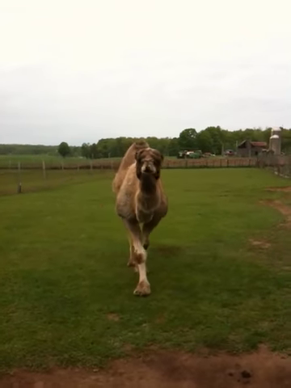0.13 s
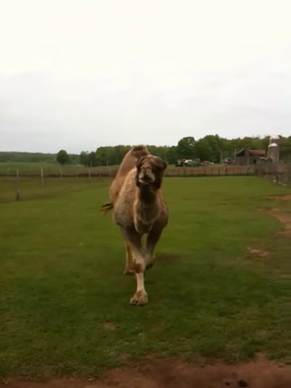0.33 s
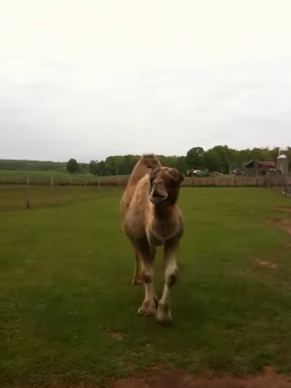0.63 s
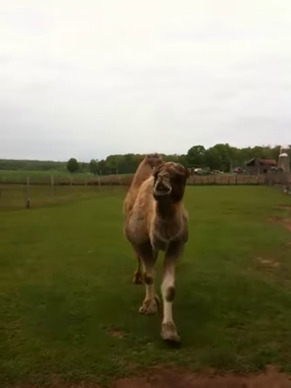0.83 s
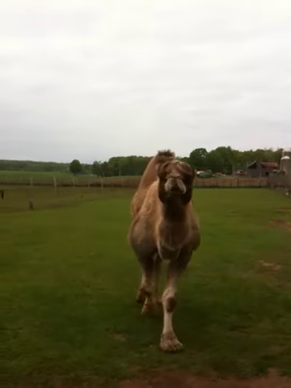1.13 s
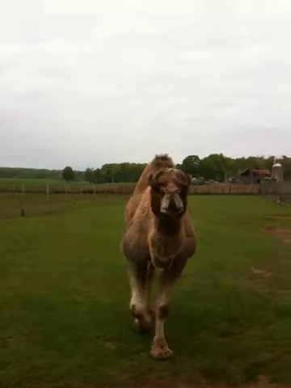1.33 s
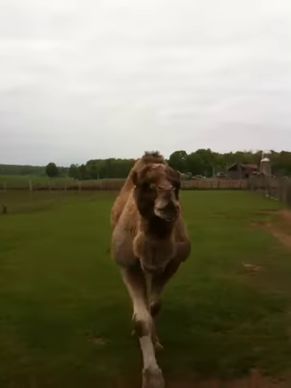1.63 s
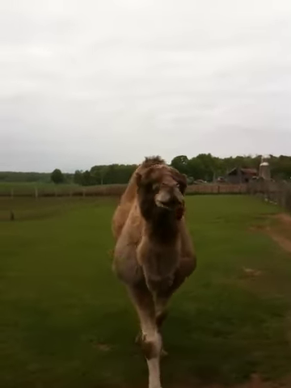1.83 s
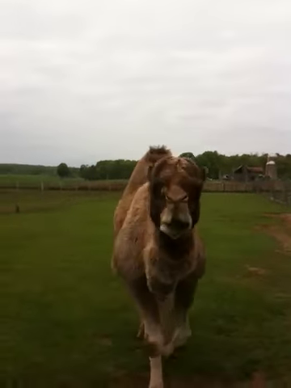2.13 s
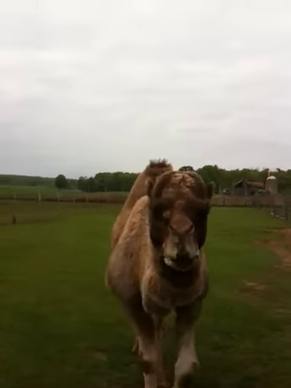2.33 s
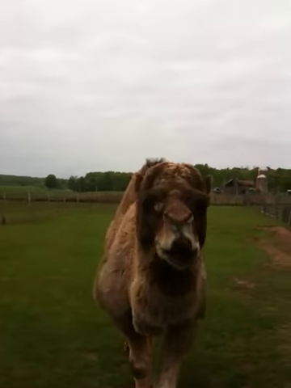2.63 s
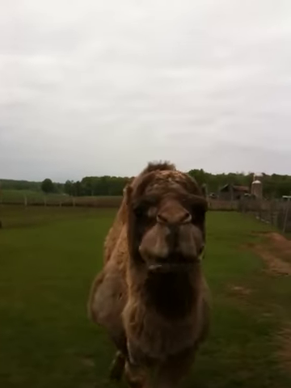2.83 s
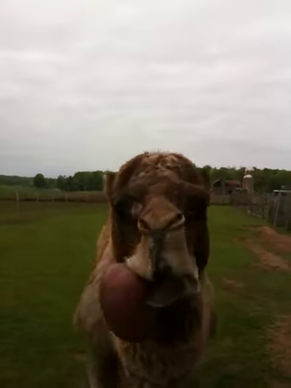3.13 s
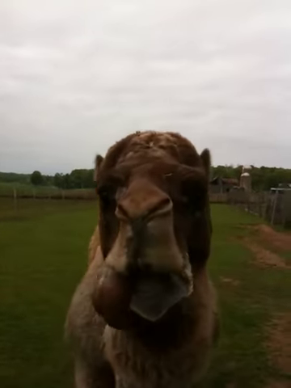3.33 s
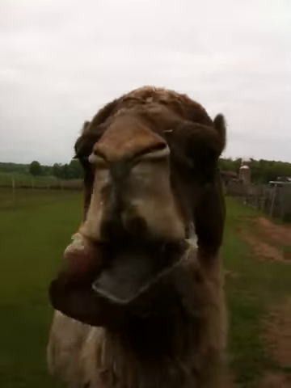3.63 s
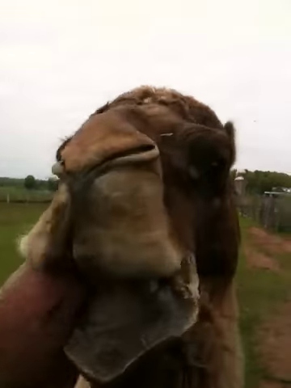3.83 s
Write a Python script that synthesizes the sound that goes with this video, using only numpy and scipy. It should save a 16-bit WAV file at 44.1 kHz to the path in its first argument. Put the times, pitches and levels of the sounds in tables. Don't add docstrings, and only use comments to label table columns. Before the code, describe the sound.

Camel gurgling very close to a handheld microphone outdoors: near silence with faint wind first, a few dull steps, a slow rattling throat growl, then loud deep bubbling, flapping and spitty air bursts.

```python
import sys
import numpy as np
from scipy import signal
from scipy.fft import rfft, irfft, next_fast_len
from scipy.io import wavfile
from scipy.ndimage import uniform_filter1d, map_coordinates

SR = 44100
rng = np.random.default_rng(int(sys.argv[2]) if len(sys.argv) > 2 else 0)


def natural_amplitude(level_db):
    exponent = np.asarray(level_db, float) / 20
    return 10 ** exponent


def wav_out(sig):
    wavfile.write(sys.argv[1], SR, np.round(np.clip(np.atleast_2d(sig).T, -1, 1) * 32767).astype(np.int16))


N = 176400


def unit(x):
    return x / np.sqrt(np.mean(x ** 2) + 1e-20)


def curves(rows):
    s, *columns = np.transpose(rows)
    return [np.interp(np.arange(N) / SR, s, column) for column in columns]


def wobble(rate):
    knots = rng.standard_normal(int(N * rate / SR) + 4)
    return map_coordinates(knots, [np.arange(N) * rate / SR])


def filtered(x, response):
    m = next_fast_len(N + SR // 2)
    return irfft(rfft(x, m) * response(np.fft.rfftfreq(m, 1 / SR)), m)[:N]


def noise(points, tilt_db=0):
    f, db = np.transpose(points)

    def colour(hz):
        level_db = np.interp(np.log(hz + 1), np.log(f + 1), db, -120, -120)
        return natural_amplitude(level_db + tilt_db * np.log2(hz / 3000 + 0.091))

    return unit(filtered(rng.standard_normal(N), colour))


def patchy(x, depth_db):
    z = signal.stft(x, nperseg=512)[2]
    field = uniform_filter1d(rng.standard_normal(z.shape), size=3, axis=0)
    field = uniform_filter1d(field, size=4, axis=1)
    return unit(signal.istft(z * natural_amplitude(depth_db * unit(field)), nperseg=512)[1][:N])


def resonate(x, peaks):
    def response(f):
        total = 0
        for k, (centre, width, db) in enumerate(peaks):
            peak = 1j * f * width / (centre ** 2 - f ** 2 + 1j * f * width)
            total = total + (-1) ** k * natural_amplitude(db / 2) * peak
        return total ** 2

    return unit(filtered(x, response))


def bubbles(rows, cycles, soft, rise, gain_db):
    out = np.zeros(N + SR)
    for (s, db, hz), start in zip(rows, rng.random(len(rows))):
        u = np.arange(int(8 * cycles * SR / hz)) * hz / SR / cycles
        shape = (1 - np.exp(-u / soft)) * np.exp(-u)
        tone = np.sin(2 * np.pi * (cycles * (u + rise * u * u / 2) + start))
        out[round(s * SR):][:len(u)] += natural_amplitude(db + gain_db) * shape / shape.max() * tone
    return out[:N]


def gulps(rows, rise):
    out, shake = np.zeros(N + SR), wobble(60)
    for (s, length, db, hz), start in zip(rows, rng.random(len(rows))):
        u = np.linspace(-1, 1, int(1.15 * length * SR))
        at = int((s - .575 * length) * SR)
        near = np.minimum(at + np.arange(len(u)), N - 1)
        pitch_hz = hz * (1 + rise * u / 2 + 0.043 * shake[near])
        phase = 2 * np.pi * (start + np.cumsum(pitch_hz) / SR)
        out[at:][:len(u)] += np.sqrt(2) * natural_amplitude(db) * np.cos(np.pi * u / 2) ** 1.23 * np.sin(phase)
    return out[:N]


# pitch_hz, level_db (per Hz)
HISS_COLOUR = [(530, -33.5), (1000, -3.5), (5000, -6), (15700, -9)]


def hiss():
    return natural_amplitude(-76.5) * noise(HISS_COLOUR)


# pitch_hz, level_db (per Hz)
WIND_COLOUR = [(25, -26), (140, 0), (310, -7.5), (430, -14.5), (1000, -22.5), (2000, -39)]
# middle_s, length_s, level_db, pitch_hz
BUFFETS = [
    (2.35, .5, -78, 45.4),
    (3.645, .05, -65, 34.5),
]


def wind():
    rumble = natural_amplitude(-71 + 1.5 * wobble(1.75) + 3.2 * wobble(20)) * noise(WIND_COLOUR)
    return rumble + natural_amplitude(4.5 * wobble(25)) * gulps(BUFFETS, rise=0.064)


# start_s, peak_db, pitch_hz
STEPS = [
    (.696, -50, 140),
    (1.091, -54, 310),
    (1.423, -43, 177),
    (2.074, -35.5, 190),
    (2.872, -41, 213),
]


def feet():
    scuffs = [(s - .003, db - 12, 2.7 * hz) for s, db, hz in STEPS[:3]]
    thuds = bubbles(STEPS, cycles=0.73, soft=0.54, rise=-0.1, gain_db=0.5)
    return thuds + bubbles(scuffs, cycles=1.0, soft=0.45, rise=0.01, gain_db=-4.0)


# time_s, level_db, mouth_open_db
GROWL = [(0, -101, -26), (.58, -91, -26), (.7, -66.5, -38), (.9, -78.5, -23), (1.06, -63.5, -20.5),
         (1.3, -82, -11), (1.5, -66.5, -25), (1.64, -57, -18), (1.8, -58.5, -27), (1.91, -48, -27.5),
         (2.0, -55.5, -26.5), (2.13, -52, -11), (2.3, -51, -13), (2.42, -47, -9.5), (2.56, -52, -17.5),
         (2.64, -52, -13.5), (2.78, -51.5, -27.5), (2.87, -47.5, -25.5), (3.05, -55, -16.5)]
# time_s, roughness (0-1)
ROUGHNESS = [
    (1.4, .5),
    (1.6, .12),
    (1.82, .15),
    (1.9, .35),
    (2.1, .12),
    (2.76, .08),
    (2.86, .5),
]
# time_s, pulses
BEATS = [(0, 0), (1.552, 44), (1.662, 47), (1.722, 49), (1.83, 52), (1.905, 55), (2.041, 61), (2.116, 65),
         (2.191, 69), (2.328, 76), (2.391, 79), (2.493, 84), (2.607, 89), (2.712, 94), (2.872, 101),
         (3.1, 112)]
# pitch_hz, width_hz, level_db
THROAT = [(125, 65.5, -14.5), (186.5, 31, 0.5), (250.7, 54, -15.5), (401.6, 90, -23.5)]
# pitch_hz, width_hz, level_db
MOUTH = [(514, 210, -6), (664.6, 80, 3.5), (776, 90, -14.5)]
# pitch_hz, width_hz, level_db
CHEST = [(140, 60, 0.5), (297, 72, -4)]
# pitch_hz, width_hz, level_db
GAPE = [(647, 83, -2), (810, 80, 0.5)]
# time_s, chest_db, gape_db
POSTURE = [
    (1.5, -7.5, -47),
    (1.8, 1, -40),
    (2.0, -1, -48),
    (2.1, -24, -42),
    (2.36, -23, -28),
    (2.4, -25, -8.5),
    (2.48, -22, -20),
    (2.57, -24, -17),
    (2.62, -26, -40),
    (2.9, -6.5, -32),
]


def growl():
    level_db, open_db = curves(GROWL)
    rough, = curves(ROUGHNESS)
    beats, = curves(BEATS)
    chest_db, gape_db = curves(POSTURE)
    turns = np.maximum.accumulate(beats + .25 + .2 * rough * wobble(30))
    clicks = np.diff(np.floor(turns), prepend=0) * natural_amplitude(7.5 * rough * wobble(45))
    pulses = unit(clicks / np.sqrt(np.gradient(beats) * SR + 1))
    breath = unit(rng.standard_normal(N) * np.exp(-3 * (turns % 1)))
    source = np.sqrt(1 - rough) * pulses + np.sqrt(rough) * breath
    rasp = source + .7 * breath

    voice = resonate(source, THROAT)
    voice = voice + natural_amplitude(chest_db) * resonate(source, CHEST)
    voice = voice + natural_amplitude(gape_db) * resonate(rasp, GAPE)
    voice = voice + natural_amplitude(open_db + 0.5 + 1.5 * wobble(14)) * resonate(rasp, MOUTH)
    voicing = np.arange(N) < 3.1 * SR
    return voicing * natural_amplitude(level_db) * voice


# start_s, attack_s, length_s, level_db, brightness_db (per octave)
PUFFS = [
    (3.128, 0.027, 0.078, -66.5, 2.5),
    (3.276, 0.048, 0.072, -56, 2.5),
    (3.326, 0.036, 0.11, -57, 0),
    (3.403, 0.028, .085, -70.5, 3),
    (3.619, 0.011, 0.042, -51, 1),
    (3.645, 0.02, 0.056, -52.5, -1.5),
]
# pitch_hz, level_db (per Hz)
PUFF_AIR = [(400, -23.5), (750, -5.5), (1150, -9), (1650, -17.5), (6100, -24.5), (15000, -47.5)]
# middle_s, level_db, pitch_hz
FIZZ = [
    (3.325, -65, 3300),
    (3.335, -71, 6340),
    (3.396, -61.5, 2740),
    (3.415, -60, 3512),
    (3.424, -66, 4570),
    (3.439, -63.5, 3950),
    (3.447, -67, 4840),
    (3.475, -73, 4960),
    (3.468, -64, 1235),
    (3.511, -67, 1200),
]
# start_s, peak_db, pitch_hz
SPIT = [(1.889, -63, 595), (1.889, -72, 1300), (2.041, -67, 555), (2.117, -67, 5060), (3.7165, -53, 1600),
        (3.746, -63, 2200), (3.754, -57, 2380), (3.756, -56.5, 6000), (3.774, -71, 2200),
        (3.774, -68, 6500), (3.781, -65.5, 1700), (3.9, -59, 3000), (3.9, -62, 7000), (3.921, -61.5, 1435),
        (3.9433, -65, 1500), (3.9518, -64.5, 1400), (3.488, -66.5, 5200)]


def droplets():
    luck = rng.random((2500, 3))
    start_s = 3.1 + .65 * luck[:, 0]
    level_db = -9 * np.log(luck[:, 1]) / 2.3
    pitch_hz = 900 * 8 ** luck[:, 2]
    drops = bubbles(np.c_[start_s, level_db, pitch_hz], cycles=5.5, soft=0.26, rise=0.011, gain_db=0)
    return unit(drops) * np.sqrt(.65 * SR / N)


def lips():
    t, out, drops = np.arange(N) / SR, 0, droplets()
    for s, attack, length, db, tilt_db in PUFFS:
        opening = np.clip((t - s) / attack, 0, 1) ** 2
        release = np.exp(-np.clip(t - s - length, 0, None) / 0.013)
        sputter = natural_amplitude(db + 0.54 * wobble(180) + 1.2 * wobble(40))
        wet_air = patchy(noise(PUFF_AIR, tilt_db), depth_db=3) + natural_amplitude(-11.5) * drops
        out = out + sputter * opening * release * wet_air
    fizz = natural_amplitude(-1.5) * gulps([(s, .016, db, hz) for s, db, hz in FIZZ], rise=0.023)
    return out + fizz + bubbles(SPIT, cycles=1.3, soft=.3, rise=.15, gain_db=7.5)


# middle_s, length_s, level_db, pitch_hz
CHEEK = [(3.11, 0.048, -51.5, 414), (3.19, 0.048, -49.5, 443), (3.318, 0.027, -43, 435),
         (3.36, 0.049, -33, 405), (3.423, 0.057, -31.5, 423.6), (3.71, 0.046, -37.5, 435),
         (3.76, 0.044, -45.5, 546), (3.895, 0.069, -35.5, 535), (3.905, 0.049, -37.5, 451),
         (3.975, 0.048, -36, 437), (3.983, .04, -36, 519.8)]
# middle_s, length_s, level_db, pitch_hz
RATTLES = [(3.02, 0.034, -66.5, 836), (3.035, 0.023, -68.5, 1645), (3.07, .05, -72, 1216),
           (3.09, 0.042, -61, 700), (3.17, 0.065, -53, 684), (3.2, .06, -70.5, 1217),
           (3.35, 0.076, -51.5, 764), (3.35, 0.037, -61, 1153), (3.43, 0.065, -56.5, 900),
           (3.43, 0.061, -56, 1190), (3.53, .03, -64, 1170), (3.58, .06, -68.5, 1180),
           (3.64, .04, -48, 628.4), (3.65, 0.051, -54, 950), (3.665, 0.048, -58, 1230),
           (3.75, 0.048, -51, 626), (3.835, 0.028, -60, 700), (3.95, .06, -51, 822),
           (3.94, 0.057, -53, 620)]


def mouth_bubbles():
    cheek = gulps(CHEEK, rise=0.04) * unit(2.5 + wobble(150))
    return cheek + gulps(RATTLES, rise=0.04) * unit(.6 + wobble(150))


# time_s, effort_db, wetness_db
CHURN = [
    (2.88, -90, -84),
    (3.0, -51, -67.5),
    (3.161, -33, -60),
    (3.25, -32, -57),
    (3.42, -32, -51),
    (3.53, -30, -63),
    (3.68, -31, -49.5),
    (3.788, -44, -58.5),
    (3.95, -31, -51),
]
# pitch_hz, level_db
FROTH = [(100, -25), (180, 2.5), (290, -0.5), (350, -17), (520, -31.5)]
# pitch_hz, level_db (per Hz)
SLOBBER = [(380, -10.5), (520, -4.5), (800, -13.5), (1020, -23), (1200, -24), (1450, -32.5), (2500, -37),
           (7500, -49)]
# time_s, pitch_hz
SAC_NOTE = [
    (3.08, 239),
    (3.118, 235),
    (3.184, 259),
    (3.234, 246),
    (3.4, 263),
    (3.57, 245),
    (3.656, 262),
    (3.74, 251),
]


def froth():
    effort_db, wet_db = curves([(2.8, -100, -100)] + CHURN)
    note_hz, = curves(SAC_NOTE)
    ring = unit((1.8 + wobble(40)) * np.sin(2 * np.pi * np.cumsum(note_hz) / SR))
    ring = ring * (np.arange(N) < 3.72 * SR)
    foam = natural_amplitude(1 + 1.1 * wobble(45)) * noise(FROTH)
    slobber = natural_amplitude(wet_db) * patchy(noise(SLOBBER), depth_db=5.0)
    return natural_amplitude(effort_db - 1.5) * (foam + natural_amplitude(-2) * ring) + slobber


# middle_s, level_db, pitch_hz
SAC = [(2.993, -42, 218), (3.031, -44.5, 262), (3.085, -39.5, 238), (3.126, -26.5, 202),
       (3.164, -26.5, 246), (3.193, -21, 259.2), (3.25, -24.5, 237), (3.287, -30.5, 246), (3.314, -25, 245),
       (3.339, -23.5, 285), (3.37, -30, 277), (3.39, -21.5, 272), (3.413, -21, 272), (3.436, -21.5, 273),
       (3.469, -25, 269.4), (3.52, -25, 251), (3.539, -22, 237.4), (3.584, -25, 252.8), (3.607, -22.5, 258),
       (3.638, -17.5, 261), (3.663, -18.5, 270), (3.699, -22, 254.7), (3.899, -26, 212.7),
       (3.952, -28, 261)]


def sac_bubbles():
    return gulps([(s, 7.54 / hz, db, hz) for s, db, hz in SAC], rise=0.12)


# middle_s, length_s, level_db, pitch_hz
FLAP = [(2.966, 0.067, -40.5, 137.4), (3.01, 0.044, -43.5, 110.9), (3.046, 0.049, -43, 166.7),
        (3.09, .05, -35.5, 150.6), (3.131, .06, -36.5, 111.1), (3.175, .05, -33.5, 137.2),
        (3.24, 0.086, -31.5, 116.5), (3.3, .05, -35.5, 134.2), (3.349, .06, -30, 125),
        (3.397, .05, -28, 138.4), (3.449, .06, -29, 131.7), (3.51, .06, -26, 139.8),
        (3.568, 0.061, -22.5, 139.4), (3.64, 0.08, -29, 136.4), (3.694, 0.065, -28, 133),
        (3.757, .055, -26, 122), (3.815, 0.07, -21.5, 126.1), (3.856, 0.047, -19, 132.1),
        (3.929, 0.064, -20, 139), (3.988, .05, -22, 165.7)]
# multiple, level_db
FLAP_OVERTONES = [(2, -14), (3, -23.5), (4, -38.5)]


def flap():
    t = np.arange(N) / SR
    s, length, db, hz = np.transpose(FLAP)[:, :, None]
    swell = np.cos(np.pi / 2 * np.clip((t - s) / (0.59 * length), -1, 1)) ** 2
    size = np.sqrt(2 * np.sum((natural_amplitude(db) * swell ** 0.68) ** 2, axis=0))
    pitch_hz = np.interp(t, s[:, 0], hz[:, 0]) * (1 + 0.04 * wobble(60))
    phase = 2 * np.pi * np.cumsum(pitch_hz) / SR
    tone = np.sin(phase)
    for multiple, level_db in FLAP_OVERTONES:
        tone = tone + natural_amplitude(level_db + 3.5 * wobble(60)) * np.cos(multiple * phase)
    return size * tone


def palate():
    return flap() + sac_bubbles() + mouth_bubbles() + froth()


def scene():
    camel = feet() + growl() + lips() + palate()
    low_cut_hz = 62
    near = filtered(camel, lambda f: (1j * f / (low_cut_hz + 1j * f)) ** 3)
    return (near + wind() + hiss())[None]


def low_pass(x):
    return signal.sosfilt(signal.butter(12, 16130, fs=SR, output="sos"), x)


def record(dry):
    return low_pass(dry)


dry = scene()
out = record(dry)
wav_out(out)
```